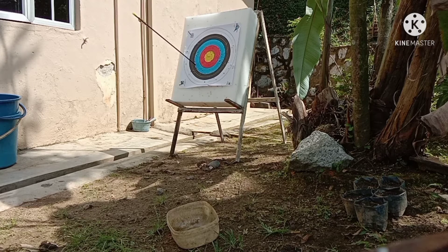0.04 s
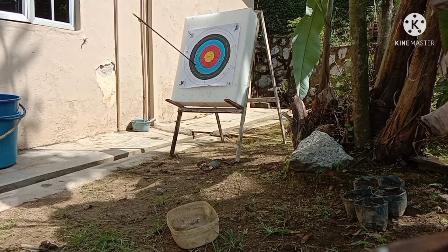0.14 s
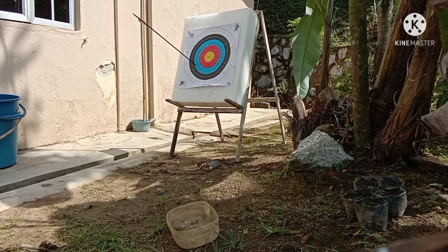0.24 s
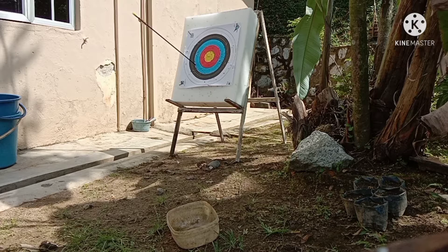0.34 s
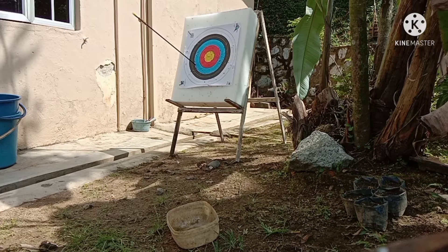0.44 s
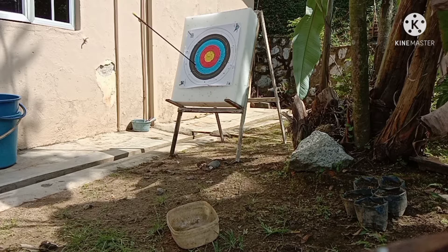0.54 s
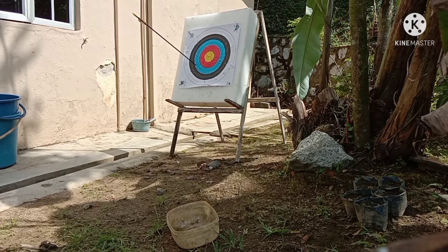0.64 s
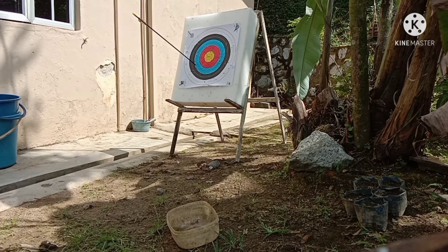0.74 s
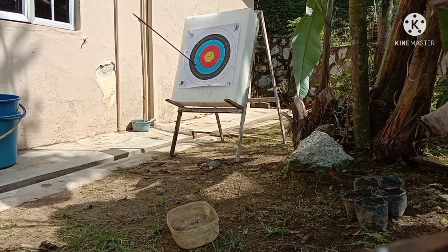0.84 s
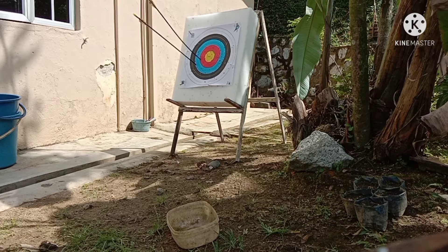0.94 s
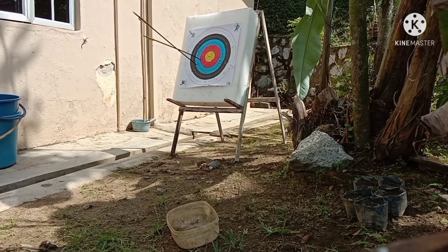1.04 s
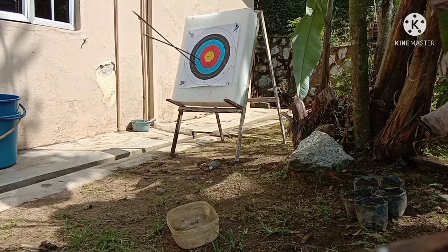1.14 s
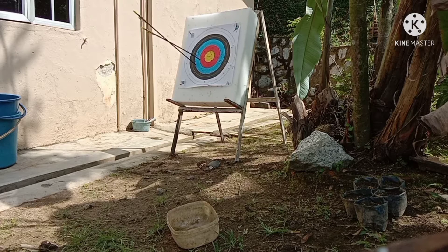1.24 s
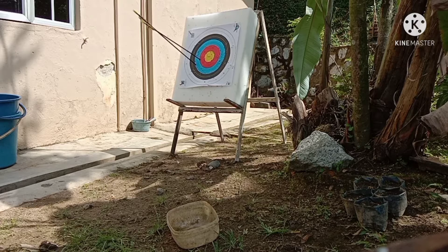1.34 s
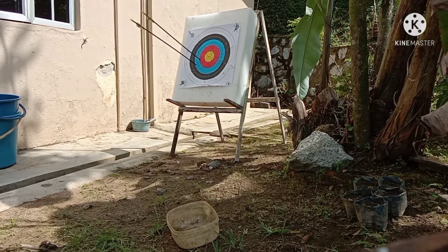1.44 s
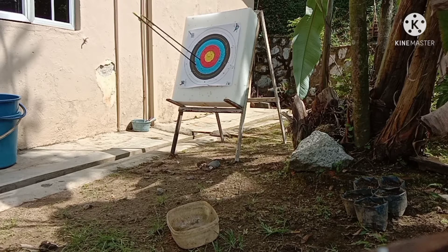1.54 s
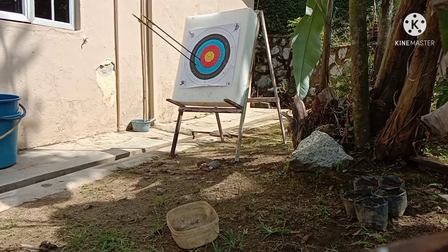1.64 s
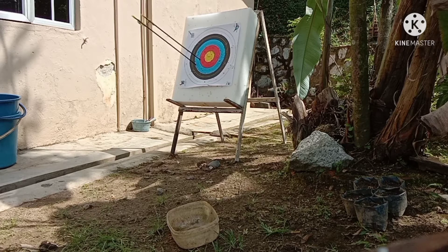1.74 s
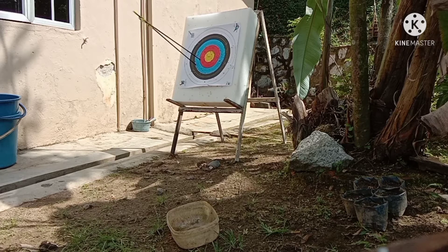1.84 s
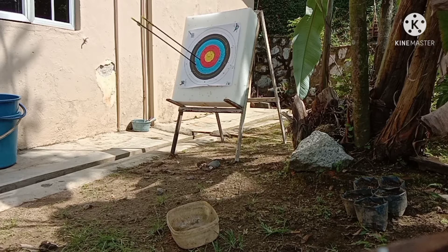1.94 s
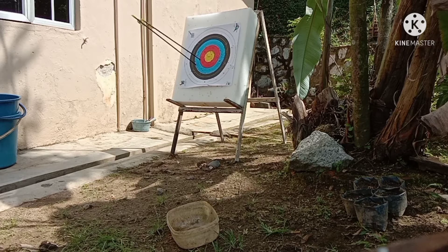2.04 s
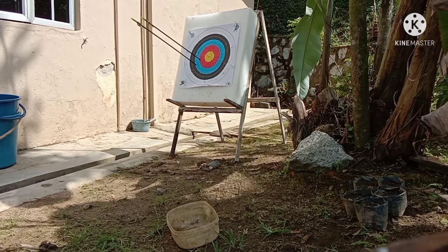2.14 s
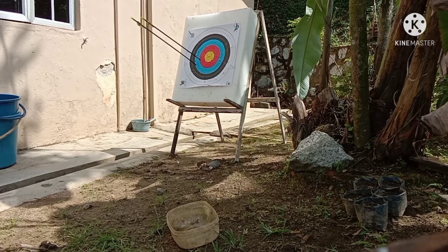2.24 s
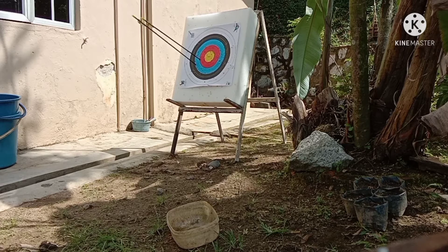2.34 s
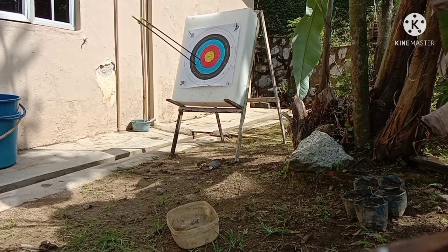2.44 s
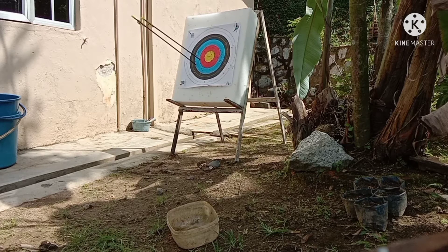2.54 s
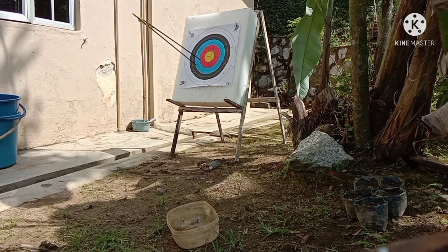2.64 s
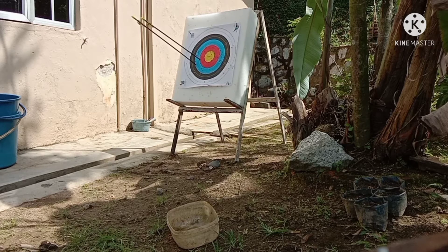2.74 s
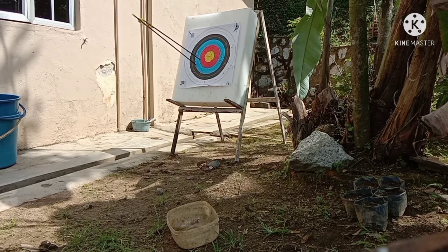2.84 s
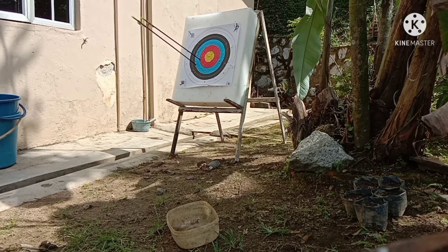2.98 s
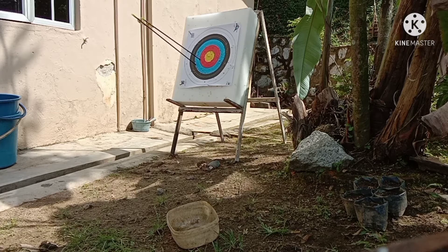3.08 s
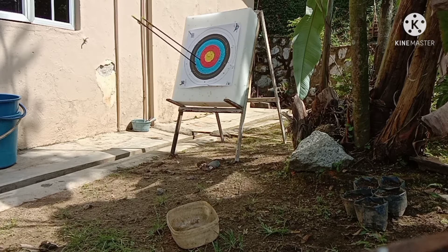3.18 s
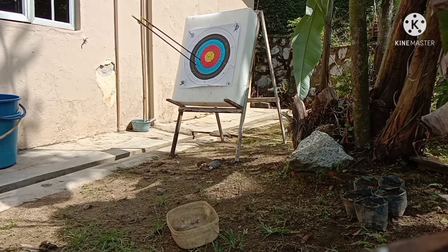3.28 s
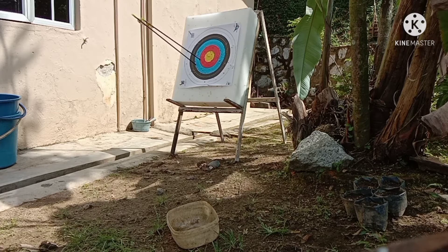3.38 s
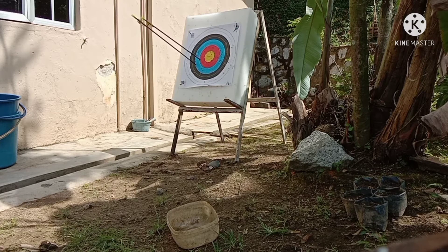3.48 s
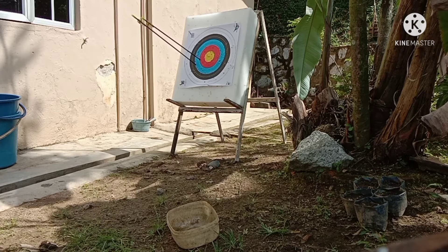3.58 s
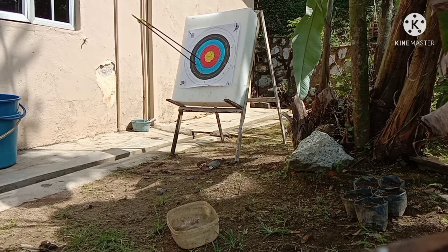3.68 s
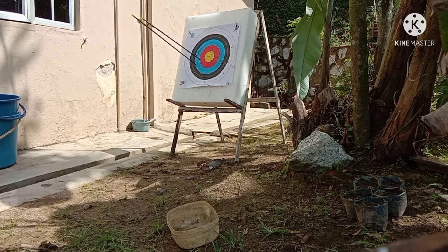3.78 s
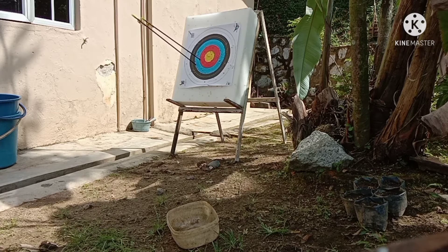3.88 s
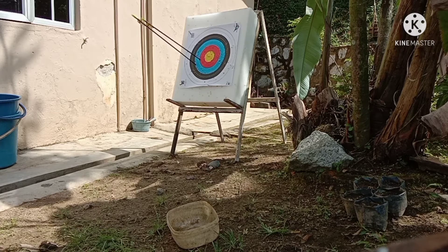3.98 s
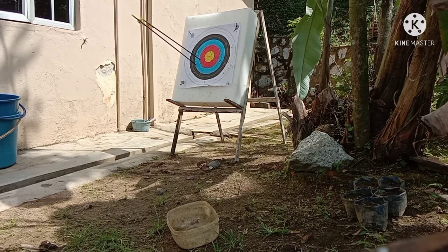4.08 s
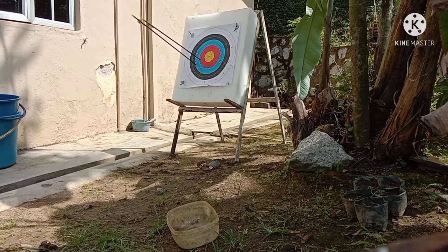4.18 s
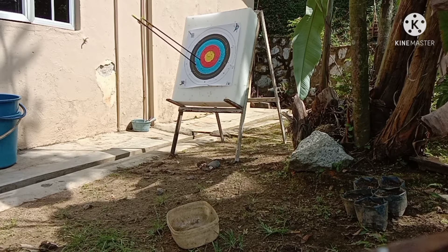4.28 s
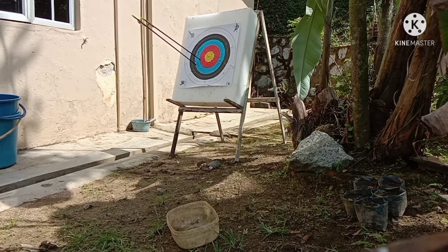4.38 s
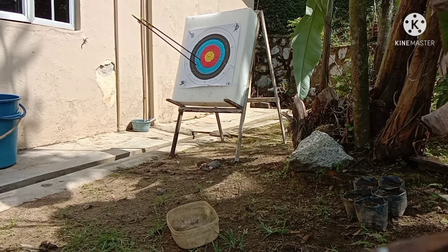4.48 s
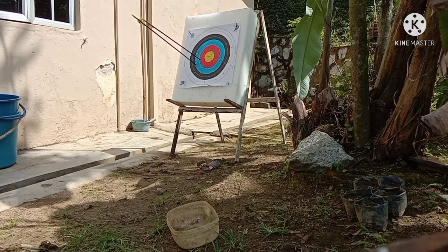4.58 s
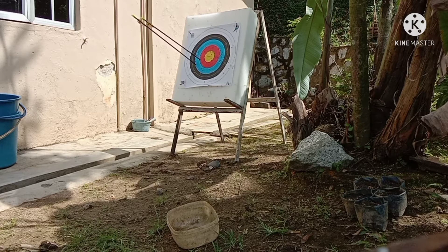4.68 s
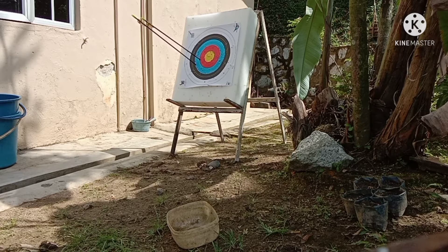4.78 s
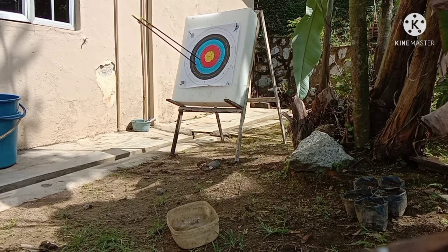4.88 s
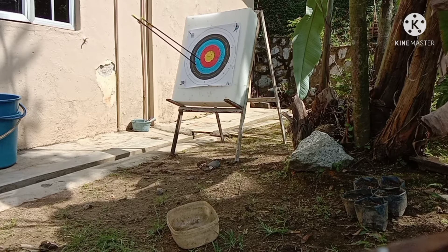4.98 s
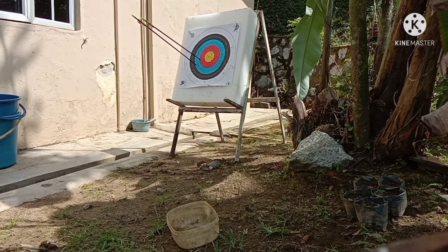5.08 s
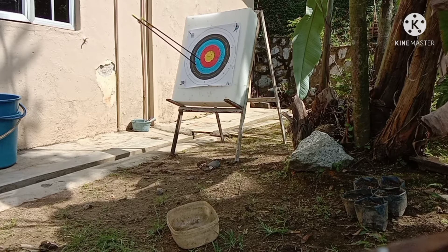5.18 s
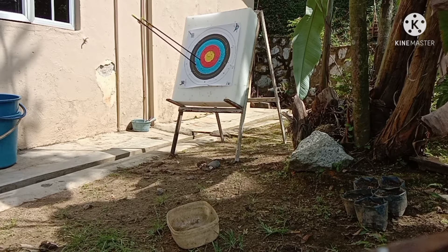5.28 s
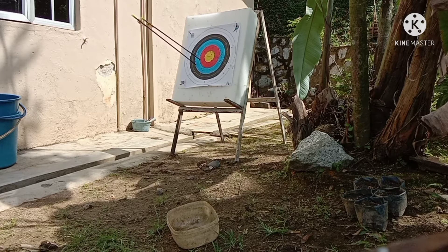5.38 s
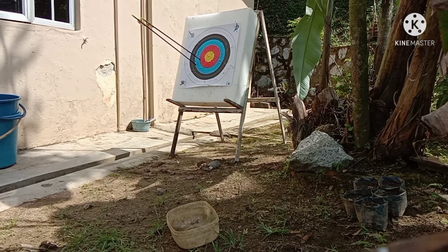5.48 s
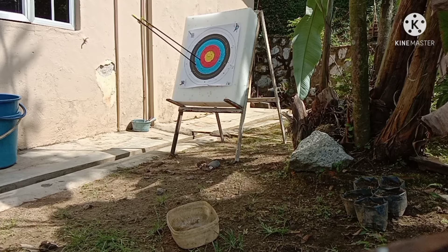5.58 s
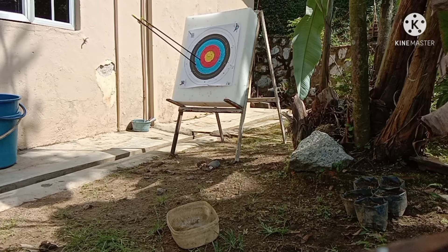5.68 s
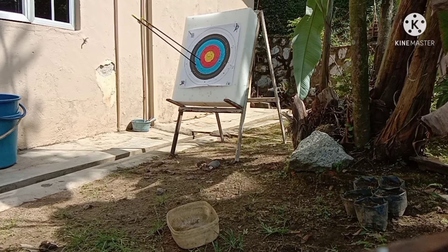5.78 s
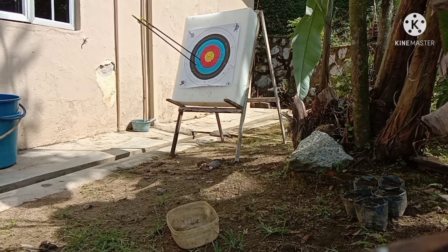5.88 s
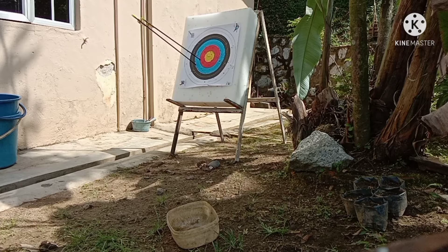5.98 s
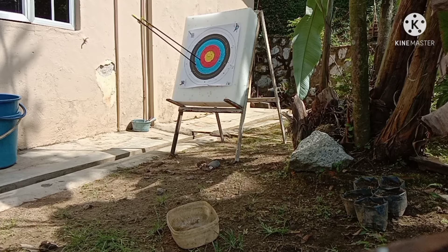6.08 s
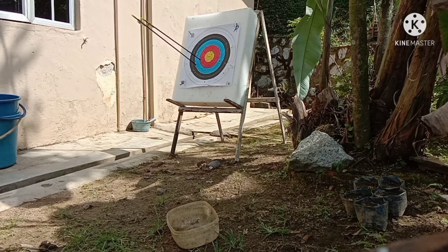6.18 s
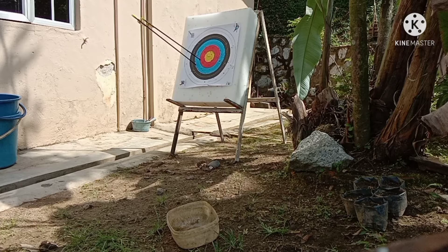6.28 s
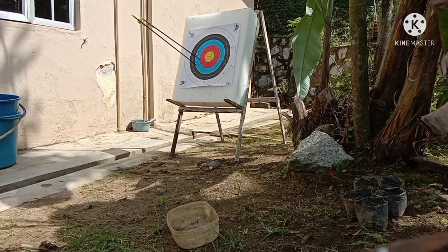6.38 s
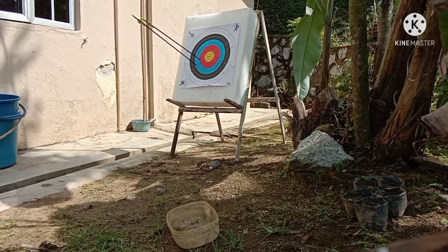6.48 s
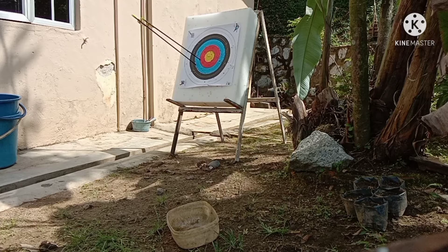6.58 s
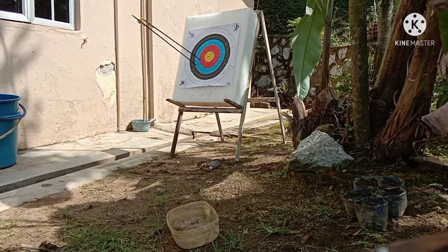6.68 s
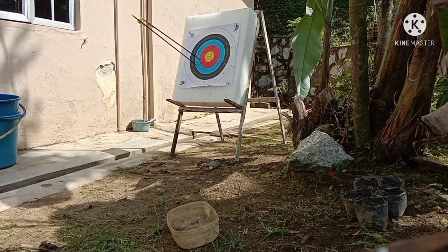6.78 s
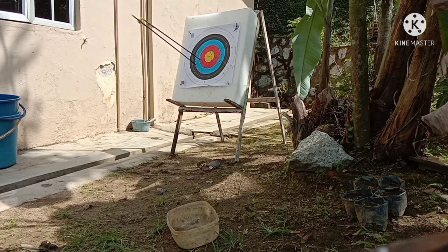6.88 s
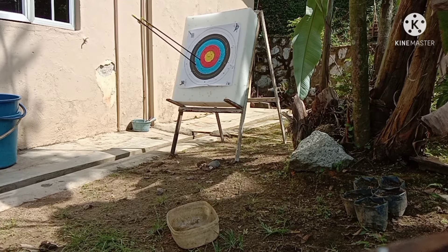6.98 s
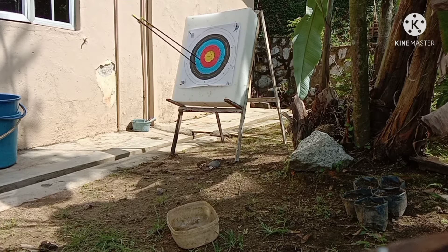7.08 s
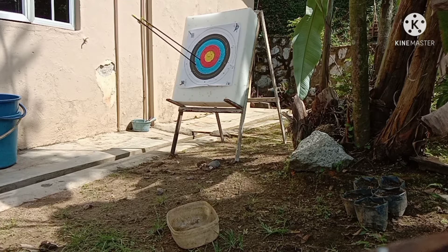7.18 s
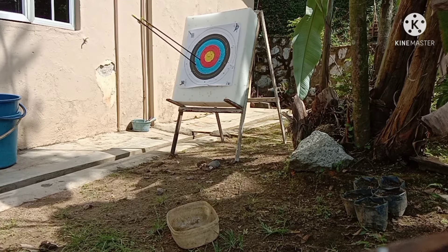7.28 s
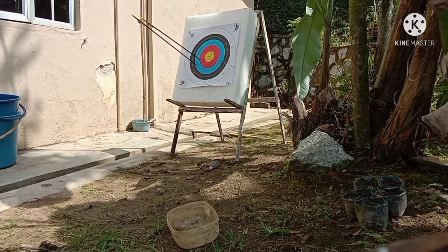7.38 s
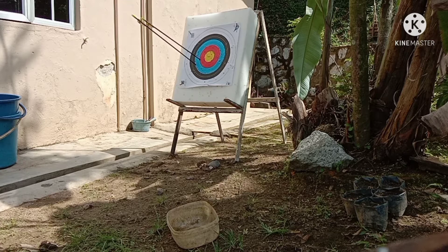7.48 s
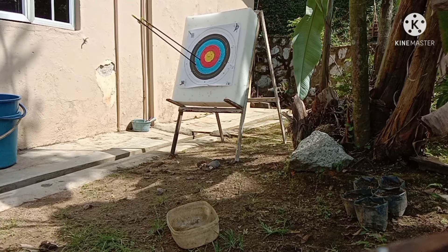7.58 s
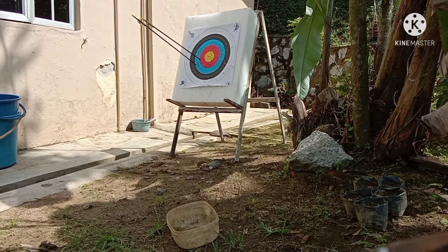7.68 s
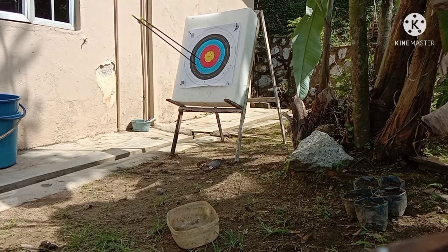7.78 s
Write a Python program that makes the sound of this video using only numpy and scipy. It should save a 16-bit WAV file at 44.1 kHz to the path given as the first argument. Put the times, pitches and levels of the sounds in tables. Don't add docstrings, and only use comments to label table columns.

```python
import sys
import numpy as np
from scipy import signal
from scipy.fft import rfft, irfft, next_fast_len
from scipy.io import wavfile
from scipy.ndimage import uniform_filter1d, map_coordinates

SR = 44100
rng = np.random.default_rng(int(sys.argv[2]) if len(sys.argv) > 2 else 0)


def ratio_of_db(decibels):
    return 10 ** (np.asarray(decibels, float) / 20)


def wav_record(signal):
    frames = np.transpose(np.atleast_2d(signal))
    bounded = np.clip(frames, -1, 1)
    quanta = np.round(bounded * 32767).astype(np.int16)
    wavfile.write(sys.argv[1], SR, quanta)


N = 345303
T = np.arange(N) / SR

# time_s, level_db
ROAD = [
    (0, -68.5),
    (1.3, -69.5),
    (2.5, -70.5),
    (5, -71),
    (7.83, -69),
]
# freq_hz, level_db
TRAFFIC_TONE = [(15, -53.5), (25, -28.5), (37, -23), (103, -4), (169, -8), (254, -12.5), (340, -14.5),
                (425, -20.5), (854, -13), (2630, -32.5), (3010, -32.5), (3290, -34), (5400, -42),
                (7020, -75), (11900, -120)]
# start_s, length_s, pitch_hz, level_db
DRONES = [(3.18, .13, 2350, -81.5), (3.2, .07, 1800, -77), (1.1, .15, 880, -63), (1.26, .16, 970, -65),
          (1.85, .32, 880, -69.5), (7.51, .11, 950, -64), (7.55, .07, 720, -67), (7.76, .05, 720, -66),
          (6.86, .12, 1120, -69), (7.2, .08, 1270, -70), (.15, .12, 700, -69), (2.2, .08, 1280, -72),
          (6.23, .09, 720, -70)]
# freq_hz, level_db
CICADA_TONE = [(5300, -60.5), (5950, -33.5), (6080, -24), (6150, -4), (6420, -6), (6520, -14.5),
               (6700, -12), (7050, -0.5), (7500, -0.5), (7800, -5), (8200, -16), (8500, -28), (9000, -43.5),
               (12000, -81.5)]
# freq_hz, level_db
CICADA_TOP_TONE = [(5290, -57.5), (9000, -28.5), (9900, -31), (10800, -20), (12000, -15), (13200, -18),
                   (13700, -14.5), (14000, -3), (14600, -0.5), (15000, -0.5), (15500, -1)]
# peak_s, level_db
PUFFS = [(.03, -57), (.28, -63.5), (.53, -66), (.76, -55), (.86, -56), (1.15, -61), (1.35, -62),
         (1.67, -70), (1.87, -61), (2.13, -61.5), (2.75, -74), (3.43, -61.5), (4.6, -78), (5.21, -59),
         (5.41, -62), (5.77, -69), (6.14, -63), (6.33, -64), (6.82, -72), (7.05, -68.5), (7.38, -69),
         (7.82, -70)]
# freq_hz, level_db
BREEZE_TONE = [(15, -30), (35, -12.5), (90, 2.0), (130, -6), (220, -44.5), (500, -110)]
# (start_s, end_s, first_hz, last_hz, level_db)
SINGERS = [
    (11.6, 2.5, [(0, 1.2, 5678, 5688, -79), (1.2, 6.05, 5688, 5698, -77), (6.05, 7.1, 5695, 5698, -82), (7.1, 7.83, 5712, 5705, -89)]),
    (15.5, 7, [(2.85, 6.88, 5915, 6045, -80), (6.88, 7.83, 5965, 6010, -73), (4.4, 7.83, 6060, 6110, -85)]),
    (13, 5, [(0, 2, 6176, 6182, -73), (2, 6.3, 6192, 6190, -70), (6.3, 7.83, 6190, 6203, -75)]),
    (-13, 6, [(0, 4.5, 6368, 6356, -68.5), (4.5, 7.83, 6366, 6366, -71.5)]),
]
# start_s, length_s, first_hz, level_db
PHRASES = [(1.0, 1.57, 11600, -88), (3.75, 1.57, 11600, -88), (6.4, 1.57, 11590, -90),
           (.17, .55, 11940, -85), (3.22, .55, 11940, -85.5), (7.37, .55, 11920, -83),
           (.2, 1.9, 12140, -94), (2.45, .55, 12100, -99), (3.2, 1.4, 12150, -98), (5.35, 1.2, 12070, -97),
           (6.3, .55, 11710, -92), (.2, .4, 12120, -92), (3.22, .5, 12210, -91), (7.4, .5, 12150, -92)]
# start_s, length_s, pitch_hz, level_db
DEEP_CRICKET = [(0.337, 0.25, 3045, -85), (0.541, 0.16, 3045, -77.5), (1.31, 0.13, 3050, -77.5),
                (1.822, 0.29, 3055, -92), (2.636, .1, 3045, -82.5), (2.941, 0.14, 3050, -80),
                (3.58, 0.095, 3040, -77), (3.72, 0.28, 3030, -88), (3.662, 0.19, 2920, -86),
                (3.983, 0.086, 3045, -78.5), (4.1, 0.062, 3060, -82.5), (4.267, 0.12, 3050, -79),
                (5.03, 0.084, 2950, -84), (5.523, 0.065, 3040, -85), (5.706, 0.1, 3030, -81),
                (6.282, 0.14, 3050, -77), (6.358, 0.19, 2940, -88), (7.034, 0.28, 2915, -80.5),
                (7.652, .15, 3050, -89)]
# start_s, pitch_hz, level_db, width_hz,
# t60_s
CHIPS = [(.13, 2600, -78, 200, .25), (.14, 4300, -84, 200, .2), (.46, 3900, -82, 80, .3),
         (.63, 3500, -82, 200, .2), (2.21, 3750, -80, 120, .6), (2.225, 4650, -79, 120, .3),
         (2.25, 5400, -80, 700, .2), (2.265, 2300, -77, 400, .15), (2.3, 2850, -80, 100, .4),
         (6.695, 4500, -84, 100, .2), (7.465, 3900, -75, 900, .2), (4.43, 300, -66, 60, .4),
         (.2, 12700, -89, 1500, 1.5), (3.23, 12400, -88, 800, 2.5), (7.38, 12700, -87, 1600, 2.5)]
# start_s, length_s, first_hz, level_db
CHIRPS = [
    (2.295, .095, 3600, -71),
    (2.37, .065, 3690, -83),
    (2.645, .085, 3670, -69),
    (2.71, .07, 3730, -80),
]
# start_s, peak_db
STRING = [
    (.7245, -36),
    (.7305, -33),
    (.7342, -34),
    (.7583, -29),
    (.7621, -19),
    (.819, -27),
    (.856, -36),
]
# freq_hz, level_db
STRING_TONE = [(240, -48.5), (400, -19), (738, -9.5), (914, -19.5), (1300, -20), (1450, -10), (1610, -23),
               (2150, 0.5), (2400, -9.5), (3850, -1), (4490, -10), (7550, -6), (9350, -16.5),
               (13700, -15.5), (15500, -19)]
# freq_hz, width_hz, level_db
LIMBS = [(2170, 160, 4), (3000, 300, -2), (3800, 290, 0.5)]
# freq_hz, width_hz, level_db
HISS_PEAKS = [(2170, 200, -9), (3800, 250, -5), (2950, 400, 0), (5200, 1500, -3), (650, 300, 8), (1450, 200, 5)]
# start_s, peak_db
BLOWS = [(.9136, -15.5), (.9165, -14), (.9192, -21)]
# freq_hz, level_db
BLOW_TONE = [(180, -30), (300, -2.5), (835, -7), (1240, -2), (1670, -4.5), (1870, -13.5), (2140, -11),
             (2790, -13), (4720, -13), (6790, -22.5), (7620, -13.5), (9930, -35.5), (15500, -28)]
# freq_hz, level_db, t60_s
FACE = [(292, -11, .04), (600, 2, .045), (1200, 0, 0.04), (1610, 0, .035), (2180, -4, .03)]
# freq_hz, level_db, t60_s
BOARD = [(133.7, -2.5, 0.32), (181, 1, 0.5), (367, -9.5, 0.19), (450, -16, 0.11), (602, -10, 0.2),
         (718, -25, 0.15), (840, -14, 0.25), (949, -10, 0.32), (1083, -13, 0.26), (1225, -14, .2),
         (1328, -12, .18), (1380, -15, .2)]
# freq_hz, level_db
FOAM_TONE = [(60, -48), (130, -7.5), (300, -2), (600, -1.0), (1000, 0.5), (1600, -13), (3100, -18.0), (6000, -41.5)]
# freq_hz, t60_s
YARD = [(150, 0.18), (1000, 0.33), (3000, 0.5), (8000, 0.39), (15000, 0.32)]
# freq_hz, level_db
HEDGE_TONE = [(500, -30), (900, -7), (1700, -4.0), (3100, -2.0), (4300, -7), (5400, -15), (7000, -44)]
# start_s, length_s, band_hz, level_db
RETURNS = [
    (1.05, 0.086, 1250, -58),
    (0.98, 0.077, 1650, -66),
    (1.08, 0.12, 3120, -66.5),
    (1, 0.085, 2120, -66),
    (1.15, 0.061, 3700, -71),
    (1.16, .05, 4100, -73),
    (1.22, .08, 3200, -78.5),
    (1.1, 0.066, 5500, -74),
    (1.25, 0.085, 5200, -83),
    (1.6, .07, 1300, -71.5),
]
# start_s, peak_db
WAGS = [(1.235, -70), (1.295, -71), (1.335, -71), (1.38, -72)]
# start_s, peak_db, rise_s, ring_db
CLACKS = [
    (3.313, -38.5, 0.0022, 2.5),
    (3.401, -37, 0.0023, 6),
    (3.4043, -37, 0.00071, 0),
    (3.411, -36.5, 0.0028, 5),
    (3.4358, -30.5, 0.00028, -7.5),
    (3.485, -43, .0007, -14),
    (7.345, -60, 0.0028, -4),
]
# freq_hz, level_db
SHAFT_TONE = [(820, -51), (1400, -19), (1580, -15), (2280, -24), (2540, 0.5), (3250, -4), (4610, -5.5),
              (5040, -5), (5240, -5), (7560, -3.5), (9790, -24), (10800, -34), (15000, -23)]
# freq_hz, level_db, t60_s
SHAFT = [(1690, -17.5, 0.059), (2306, -8.5, 0.066), (3058, -0.5, 0.042), (3286, 1.5, 0.02),
         (3740, -7, 0.087), (4200, -11, 0.025), (4650, 0, 0.036), (5180, -2.5, 0.034), (7260, -9, .015)]
# freq_hz, width_hz, level_db
SHAFT_TAIL = [(1740, 100, -4), (2295, 90, 2.5), (3120, 200, -2), (3440, 120, -0.5), (4220, 200, -1),
              (4560, 150, -4), (5360, 120, 0)]
# start_s, length_s, level_db
STROKES = [
    (4.433, 0.41, -60),
    (4.8, 0.24, -69),
]
# freq_hz, level_db
RUB_TONE = [(1200, -49), (1600, -5), (2100, -19), (3000, -7), (3800, -5.5), (4600, -6), (5400, -17), (7000, -45)]
# freq_hz, width_hz, level_db
SLIDE_BODY = [(2530, 200, -2), (2900, 330, -2), (3930, 380, 0)]
# start_s, length_s, first_hz, level_db re slide
SQUEALS = [(4.46, .16, 4080, -2), (4.45, .12, 3170, -3), (4.56, .22, 3800, -5), (4.58, .07, 2900, -4),
           (4.7, .1, 3100, -5), (4.53, .19, 2450, -10), (4.51, .11, 1640, -9), (4.6, .09, 1850, -11),
           (4.69, .05, 1600, -9), (4.78, .05, 2400, -4), (4.87, .09, 3190, -3), (4.89, .07, 2250, -4),
           (4.95, .07, 2920, -2)]

RUMBLE_DB, CICADA_DB, TIRING_DB_PER_S = 5.0, -61, 0.27
DRONE_RISE_HZ, DRONE_WIDTH_HZ = 20, 110
PUFF_FADE_DB_PER_S = 109
WARM_HZ, PHRASE_WIDTH_HZ = 165, 24
STUTTER_HZ, STUTTER_DB = 3050, -95
LOOSE_S, PASS_S, LAND_S = .722, .766, .912
PASS_DB, COMING_DB_PER_S, GOING_DB_PER_S = -40.5, 149.5, 170.5
BOARD_S, DAMPED_S, ECHO_DELAY_S = .9165, .052, .077
STROKE_PEAK = 0.53
SQUEAL_SAG_HZ, SQUEAL_WIDTH_HZ = 58.8, 131
TOP_HZ = 15550


def unit(x):
    return x / np.sqrt(np.mean(x ** 2) + 1e-20)


def add(out, s, x):
    part = out[round(s * SR):][:len(x)]
    part += x[:len(part)]


def along(points, hz):
    f, v = np.transpose(points)
    return np.interp(np.log(hz + 1), np.log(f + 1), v)


def during(start, end, t=T):
    return np.clip(np.minimum(t - start, end - t) * 100, 0, 1)


def swell(t, length, peak):
    u = np.clip(t / length, 0, 1)
    return np.sin(np.pi / 2 * np.minimum(u / peak, (1 - u) / (1 - peak))) ** 2


def wobble(rate, size=N):
    at = np.arange(0, size + SR / rate, max(1, SR / rate / 16))
    knots = rng.standard_normal(int(size * rate / SR) + 5)
    return np.interp(np.arange(size), at, map_coordinates(knots, [at * rate / SR]))


def filtered(x, response):
    m = next_fast_len(len(x) + 8192)
    return irfft(rfft(x, m) * response(np.fft.rfftfreq(m, 1 / SR)), m)[:len(x)]


def resonant(peaks, f):
    return sum((-1) ** k * ratio_of_db(db) * 1j * f * w / (c * c - f * f + 1j * f * w)
               for k, (c, w, db) in enumerate(peaks))


def patches(shape):
    return uniform_filter1d(rng.standard_normal(shape), 3, 0)


def rush(spectrum, patchy_db=0, peaks=(), peak_db=0):
    z = signal.stft(rng.standard_normal(N + 512), nperseg=512)[2]
    field = unit(uniform_filter1d(patches(z.shape), 12, 1))
    x = signal.istft(z * ratio_of_db(patchy_db * field), nperseg=512)[1][:N]

    def response(f):
        lift = 1 + sum(ratio_of_db(db + peak_db) / np.sqrt(1 + (2 * (f - c) / w) ** 2) for c, w, db in peaks)
        return ratio_of_db(along(spectrum, f)) * lift
    return unit(filtered(x, response))


def whirr(hz, width_hz):
    turn = 2 * np.pi * np.cumsum(hz) / SR
    return unit(wobble(width_hz, len(hz)) * np.sin(turn) + wobble(width_hz, len(hz)) * np.cos(turn))


def phrases(rows, glide_hz, width_hz):
    out = np.zeros(N)
    for s, length, hz, db in rows:
        t = T[:round(length * SR)]
        add(out, s, ratio_of_db(db) * during(0, length, t) * whirr(hz + glide_hz * np.sqrt(t / length), width_hz))
    return out


def bursts(events, t60, rise):
    out, t = np.zeros(N), T[:round(1.5 * t60 * SR)]
    for s, db in events:
        add(out, s, ratio_of_db(db - 60 * t / t60) * np.clip(t / rise, 0, 1))
    return out


def click(s, spectrum):
    x = filtered(1. * (np.arange(N) == round(s * SR)), lambda f: ratio_of_db(along(spectrum, f)))
    return x / np.linalg.norm(x)


def yard(x, wet_db):
    hz, t, z = signal.stft(rng.standard_normal(SR // 2), SR, nperseg=256)
    ragged = unit(uniform_filter1d(patches(z.shape), 9, 1))
    reach = 1 / (1 + (t / .15) ** 8) + ratio_of_db(-15 + 5.5 * ragged)
    decay = ratio_of_db(-60 * t / along(YARD, hz)[:, None])
    tail = signal.istft(z * reach * decay, SR, nperseg=256)[1]
    return ratio_of_db(wet_db) * signal.fftconvolve(np.pad(x, (200, 0)), tail / np.linalg.norm(tail))[:N]


def far_hums(count, db):
    out, t = np.zeros(N + SR), np.arange(SR // 6) / SR
    for place, pitch, size in rng.random((count, 3)):
        tone = np.sin(2 * np.pi * 280 * 5 ** pitch * t)
        out[int(place * N):][:len(t)] += ratio_of_db(db + 6 * size) * np.hanning(len(t)) * tone
    return out[:N]


def traffic():
    road_db = np.interp(T, *np.transpose(ROAD))
    road = rush(TRAFFIC_TONE, patchy_db=3.5)
    low = filtered(road, lambda f: 1 / (1 + (f / 380) ** 4))
    low_db = np.mean(road_db) + RUMBLE_DB + 1.2 * wobble(3.8)
    motors = far_hums(count=130, db=-80.5) + phrases(DRONES, DRONE_RISE_HZ, DRONE_WIDTH_HZ)
    return ratio_of_db(low_db) * unit(low) + ratio_of_db(road_db) * unit(road - low) + motors


def cicadas():
    level_db = CICADA_DB - TIRING_DB_PER_S * T + 0.27 * wobble(2.6)
    chorus = ratio_of_db(level_db) * rush(CICADA_TONE, patchy_db=1.0)
    top_db = level_db - 17.5 + 2.8 * wobble(25) + 1.2 * wobble(5.9)
    return chorus + ratio_of_db(top_db) * rush(CICADA_TOP_TONE, patchy_db=2.0)


def breeze():
    lumps = rush(BREEZE_TONE, patchy_db=0.6)
    lumps = unit(lumps / (uniform_filter1d(np.abs(lumps), SR // 30) + .15))
    puff_db = np.max([db - PUFF_FADE_DB_PER_S * np.abs(T - s) for s, db in PUFFS], axis=0)
    return ratio_of_db(puff_db + 1.5) * lumps


def song(hz, share, beat_hz, wander_hz):
    n = len(hz)

    def tone(step):
        return np.sin(2 * np.pi * np.cumsum(hz + step * beat_hz + wander_hz * wobble(12, n)) / SR)
    first = .55 * wobble(2.5, n) * tone(1)
    second = share * ratio_of_db(2.5 * wobble(3, n)) * tone(2)
    return (tone(0) + first + second) * np.sqrt(2)


def steady_crickets():
    out = ratio_of_db(-71.5) * whirr(6310 + 0 * T, 90)
    for beat_hz, wander_hz, spells in SINGERS:
        for start, end, first_hz, last_hz, db in spells:
            t = T[:round((end - start) * SR) + SR // 20]
            voice = song(np.linspace(first_hz, last_hz, len(t)), .5, beat_hz, wander_hz)
            edges = during(0, t[-1] / 5, t / 5)
            add(out, start, ratio_of_db(db + 2.5 * wobble(5, len(t))) * edges * voice)
    return out


def high_singers():
    return ratio_of_db(2.1 * wobble(6.9)) * phrases(PHRASES, WARM_HZ, PHRASE_WIDTH_HZ)


def deep_cricket():
    out = ratio_of_db(STUTTER_DB + 3.5 * wobble(7.2)) * whirr(STUTTER_HZ + 0 * T, 60)
    for s, length, hz, db in DEEP_CRICKET:
        t = T[:round(length * SR)]
        voice = 0.71 * song(hz + 0 * t, 0.55, 6.8, 12.0) + 0.74 * whirr(hz + 0 * t, 70.3)
        add(out, s, ratio_of_db(db) * np.sqrt(swell(t, length, peak=0.62)) * voice)
    return out


def chips_and_chirps():
    out = phrases(CHIRPS, 91, 260)
    for s, hz, db, width_hz, t60 in CHIPS:
        t = T[:round(t60 * SR)]
        add(out, s, ratio_of_db(db - 60 * t / t60) * np.clip(45 * t / t60, 0, 1) * whirr(hz + 0 * t, width_hz))
    return out


def bow_release():
    fingers = bursts([(.7056, -42)], .025, .0005) * whirr(5900 + 0 * T, 3600)
    slaps = ratio_of_db(-3.5) * bursts(STRING, t60=0.0098, rise=0.00032) * rush(STRING_TONE)
    slaps = filtered(slaps, lambda f: 1 / (1 + (1700 / (f + 1)) ** 6))
    slaps = ratio_of_db(-5.5) * slaps + filtered(slaps, lambda f: resonant(LIMBS, f))
    return fingers + slaps + yard(slaps, wet_db=-5.0)


def arrow_pass():
    near_db = PASS_DB - np.maximum(COMING_DB_PER_S * (PASS_S - T), GOING_DB_PER_S * (T - PASS_S))
    flying = (T > LOOSE_S + .001) * during(0, LAND_S)
    return ratio_of_db(near_db + 1.5 * wobble(90)) * flying * rush(STRING_TONE, 1.2, HISS_PEAKS)


def point_crack():
    crack = ratio_of_db(-2) * bursts(BLOWS, t60=.022, rise=.0002) * rush(BLOW_TONE, peaks=[(3330, 520, -3)])
    t = T[:4000]
    ring = sum(ratio_of_db(level - 60 * t / t60) * np.sin(2 * np.pi * hz * t) for hz, level, t60 in FACE)
    for s, db in BLOWS:
        add(crack, s, ratio_of_db(db - 7) * ring)
    paper_snap = np.sin(2 * np.pi * 3170 * T + wobble(150))
    return crack + bursts([(.9138, -19)], t60=0.036, rise=0.00045) * paper_snap


def board_boom():
    t, boom = T[:SR // 2], np.zeros(N)
    modes = 0
    for hz, db, t60 in BOARD:
        phase = 2 * np.pi * hz * t + min(hz / 900, .8) * wobble(50, len(t))
        modes = modes + ratio_of_db(db - 60 * t / t60) * np.sin(phase)
    damping = 0.055 + 1 / (1 + (t / DAMPED_S) ** 8)
    add(boom, BOARD_S, ratio_of_db(-19.5) * (1 - np.exp(-t / 0.0055)) * damping * modes)
    return boom


def near_walls():
    walls = yard(click(.916, BLOW_TONE) + ratio_of_db(-11.0) * click(0.965, BLOW_TONE), wet_db=2.5)
    return walls + ratio_of_db(0.1) * filtered(walls, lambda f: 1 / (1 + ((f - 3150) / 200) ** 2))


def house_echo(crack, boom):
    body = filtered(boom, lambda f: 1 / (1 + (155 / (f + 1)) ** 8))
    return np.roll(ratio_of_db(-16) * crack + ratio_of_db(-13) * body, round(ECHO_DELAY_S * SR))


def far_gardens():
    far = bursts([(1.06, -63)], t60=0.6, rise=0.054) * rush(HEDGE_TONE, patchy_db=9)
    t = T[:SR // 2]
    for s, length, hz, db in RETURNS:
        add(far, s - .02, ratio_of_db(db) * swell(t, length + .05, peak=.35) * whirr(hz + 0 * t, 300))
    return far


def strike():
    crack, boom = point_crack(), board_boom()
    shudder = bursts([(.915, -24)], t60=0.23, rise=.004) * rush(FOAM_TONE, patchy_db=1.0)
    answers = near_walls() + house_echo(crack, boom) + far_gardens() + yard(boom, wet_db=-14.5)
    wag = bursts(WAGS, .06, .006) * whirr(3700 + 0 * T, 500)
    return crack + boom + shudder + answers + wag


def shaft_clacks():
    clacks, grit, t = np.zeros(N), rush(SHAFT_TONE), T[:SR // 5]
    for s, db, rise, ring_db in CLACKS:
        ring = 0
        for hz, level, t60 in SHAFT:
            mode_db = level + rng.normal(0, 2.0) - 60 * t / t60
            mode_hz = hz * (1 + rng.normal(0, 0.016))
            ring = ring + ratio_of_db(mode_db) * np.sin(2 * np.pi * mode_hz * t + 1.3 * wobble(150, len(t)))
        crack = 1.8 * ratio_of_db(-60 * t / 0.023) * grit[round(s * SR):][:len(t)]
        add(clacks, s, ratio_of_db(db - 11.5) * np.clip(t / rise, 0, 1) * (ratio_of_db(ring_db) * ring + crack))
    tail = filtered(yard(clacks, wet_db=-2.5),
                    lambda f: .33 + .5 * (f > 8000) + np.abs(resonant(SHAFT_TAIL, f)))
    return clacks + tail


def shaft_slide():
    rub = 1.01 * ratio_of_db(0.71 * wobble(60)) * rush(RUB_TONE, patchy_db=3.2, peaks=SLIDE_BODY, peak_db=11)
    rub += phrases(SQUEALS, -SQUEAL_SAG_HZ, SQUEAL_WIDTH_HZ)
    speed = sum(ratio_of_db(db) * swell(T - s, length, STROKE_PEAK) ** 0.8 for s, length, db in STROKES)
    return speed * rub


def scene():
    garden = traffic() + cicadas() + breeze()
    garden += steady_crickets() + high_singers() + deep_cricket() + chips_and_chirps()
    archery = bow_release() + arrow_pass() + strike() + shaft_clacks() + shaft_slide()
    return (garden + archery)[None]


def top_cut(x):
    return signal.sosfilt(signal.butter(12, 16670, fs=SR, output="sos"), x)


def record(dry):
    mic = lambda f: (f / 45) ** 2 / (1 + (f / 45) ** 2) * np.where(f < TOP_HZ, 1, ratio_of_db(-32.5))
    x = filtered(dry[0], mic)
    x = x / (1 + np.abs(x / .42) ** 4) ** .25
    return top_cut(x[None])


dry = scene()
out = record(dry)
wav_record(out)
```